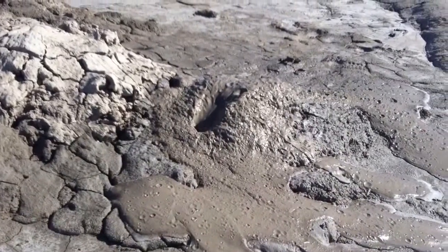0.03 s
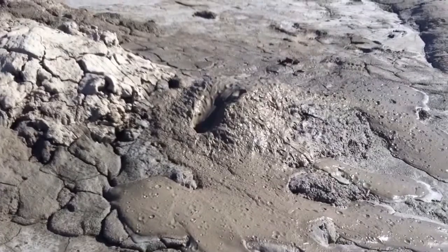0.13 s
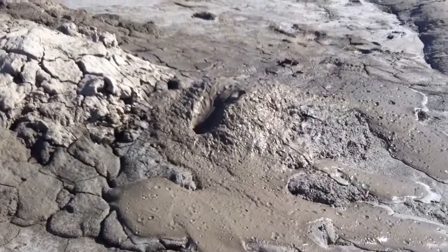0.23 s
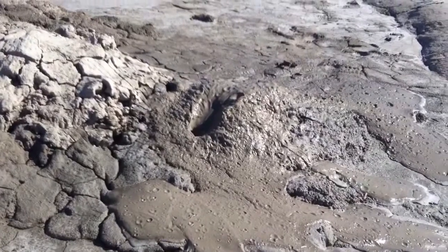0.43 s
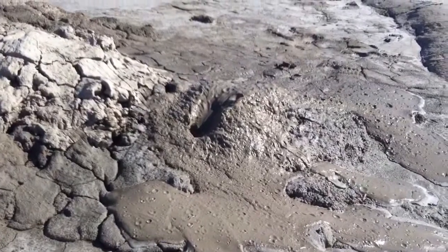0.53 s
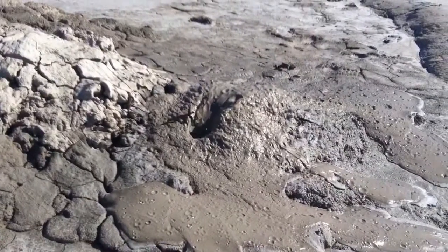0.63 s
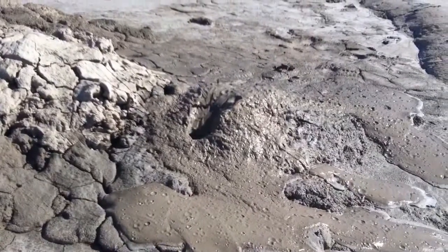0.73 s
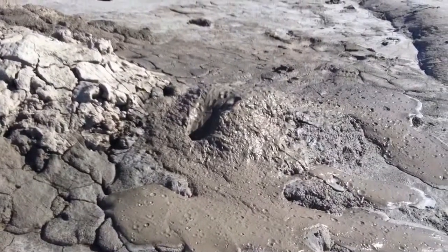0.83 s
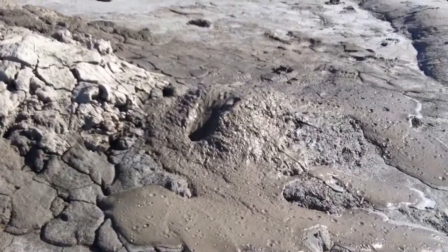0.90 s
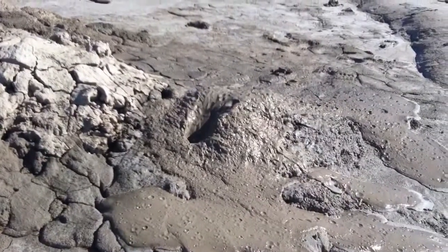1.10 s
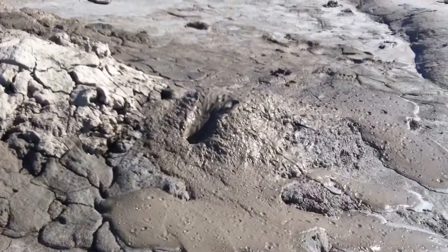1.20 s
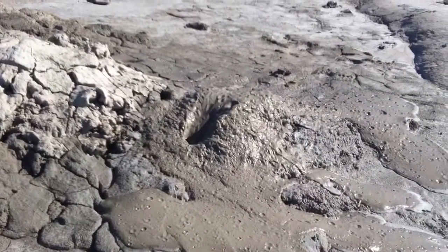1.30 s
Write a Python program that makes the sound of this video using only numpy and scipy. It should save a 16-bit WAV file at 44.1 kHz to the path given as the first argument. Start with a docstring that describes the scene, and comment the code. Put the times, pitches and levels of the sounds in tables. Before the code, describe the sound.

Gas bubbles through thick wet mud close to the microphone, popping and slapping unevenly. The gurgling swells, squelches upward and settles into a few soft, deep gulps, over a faint rush of open-air wind.

```python
"""Bubbles burst with short, mostly rising notes as gas gurgles up through thick mud.
The place is a small vent outdoors, heard close up on one small microphone.
Wet mud slaps and spatters on top, while large pockets gulp down in the throat.
One long gush of tiny bubbles swells in the middle and ends in a rising squelch as gas
squeezes through narrowing cavities. The crusted cone scatters it all; faint wind lies behind."""
import sys
import numpy as np
from scipy import signal
from scipy.fft import rfft, irfft, next_fast_len
from scipy.io import wavfile
from scipy.ndimage import uniform_filter1d

SR = 44100
rng = np.random.default_rng(int(sys.argv[2]) if len(sys.argv) > 2 else 0)


def output_pcm(signal):
    """Save a mono or channel-first signal as 16-bit PCM at the path in sys.argv[1].

    Samples are clipped to [-1, 1] before scaling.
    """
    pcm = np.clip(np.atleast_2d(signal).T, -1, 1) * 32767
    wavfile.write(sys.argv[1], SR, np.round(pcm).astype(np.int16))


N = 59535
T = np.arange(N) / SR


# bubbles bursting at the surface: t/s, f/Hz, level/dB, swell/s, decay/s, glide/(octaves/s)
BUBBLES = [(.048, 1507, -60, 0.0013, 0.0077, 2), (0.053, 3140, -54.5, 0.0012, 0.0012, 19),
           (.106, 1846, -60, 0.0012, 0.019, 13.5), (0.118, 793, -52, 0.0012, 0.0024, 23),
           (.134, 1005, -54.5, 0.0023, 0.0047, 8), (.140, 1758, -47, 0.0053, 0.005, 19),
           (.211, 832, -39.5, 0.013, 0.0015, 7.5), (0.21, 2020, -50.5, 0.0039, 0.011, -6.5),
           (.243, 1227, -42.5, 0.0032, 0.0049, -3.5), (0.243, 2380, -46.5, 0.0013, 0.004, 13),
           (.291, 2355, -41, 0.006, 0.0069, 3), (0.347, 1390, -49.5, 0.0014, 0.0044, -10),
           (.365, 2420, -42.5, 0.0009, 0.0029, 9), (.364, 1860, -40, 0.0033, 0.005, 10),
           (.365, 1393, -52.5, 0.0022, 0.017, 7), (.365, 900, -49, 0.0036, 0.0072, 5),
           (.376, 3900, -43.5, 0.0011, 0.0023, 38), (.400, 4130, -44, 0.003, 0.0031, 2.5),
           (0.424, 1400, -42.5, 0.0012, 0.004, 8.5), (.581, 996, -38, 0.00098, 0.0048, 13),
           (0.633, 1319, -37, 0.0026, 0.017, 8.5), (0.654, 3820, -45, 0.0036, 0.0069, 14.5),
           (.676, 1203, -38, 0.0053, 0.0099, 10.5), (0.679, 2330, -32.5, 0.0037, 0.0031, -2),
           (.771, 944, -30.5, 0.0019, 0.0018, 11), (.7818, 1926, -21.5, 0.00036, 0.0026, 1),
           (.779, 4920, -31, 0.00065, 0.0013, -3), (.843, 223.4, -38, 0.037, 0.013, -1.5),
           (0.882, 1690, -26.5, 0.00081, 0.0016, 10), (.916, 1790, -45, 0.0022, .010, 10.5),
           (.928, 560, -37.5, 0.005, 0.0035, 26), (.967, 1917, -37.5, 0.0021, 0.0051, 13),
           (.981, 2180, -42, 0.0016, 0.0043, 10), (0.983, 1294, -43, 0.003, 0.0065, 11),
           (1.035, 3790, -51, 0.002, 0.0025, 12), (1.036, 7440, -49.5, 0.0028, 0.0028, 8),
           (1.041, 1907, -50.5, 0.0025, 0.0066, 4.5), (1.060, 2210, -43, 0.00088, 0.0025, 15),
           (1.109, 1285, -36, 0.00089, 0.0033, 0)]

def bubbles(roughness=0.35, rough_hz=656):
    """Most bursts ring higher as the hole opens; the tearing film roughens them."""
    out = np.zeros(N)
    for start, hz, db, swell_s, decay_s, glide in BUBBLES:
        add(out, start, from_db(db) * pocket_note(hz, swell_s, decay_s, glide))
    flutter = 1 + roughness * (wobble(rough_hz) + 1j * wobble(rough_hz))  # in level and phase
    return np.real(signal.hilbert(out) * flutter)


# wet slaps of mud at the mouth: t/s, level/dB, cavity f/Hz
SLAPS = [(.173, -49, 3800), (0.219, -40.5, 418), (.243, -34.5, 2020), (.261, -43, 1390), (0.278, -45, 557),
         (0.291, -37.5, 2150), (.300, -41.5, 3000), (.346, -41.5, 1720), (0.376, -42, 3950),
         (.401, -40, 4770), (0.4239, -33, 474), (0.451, -45, 594), (.500, -46, 1360), (.533, -36.5, 462),
         (0.546, -42, 373), (.583, -41, 810), (.602, -36, 730), (.636, -37, 905), (0.645, -32.5, 1560),
         (.667, -33.5, 440), (.683, -43, 1700), (0.725, -35, 1440), (.743, -34, 6500), (.773, -33.5, 1110),
         (0.7856, -30, 2560), (0.7891, -25.5, 4300), (.840, -37, 4600), (.845, -30, 1650),
         (.882, -32.5, 310), (.896, -34, 1510), (.903, -38, 1980), (0.916, -32, 2170), (.931, -33, 990),
         (0.951, -30.5, 2700), (0.967, -38, 5200), (1.012, -42, 448), (1.06, -49.5, 690),
         (1.078, -40.5, 378), (1.109, -36.5, 860)]

def slaps(cavity_q=1.15, spray_db=-11, spray_decay_s=0.0053):
    """Each slap is a soft push and a short spray, heard through a heavily damped cavity."""
    out, t = np.zeros(N), T[:SR // 20]
    for start, db, hz in SLAPS:
        cavity = signal.iirpeak(hz, cavity_q, fs=SR)
        soft_mud = signal.butter(2, min(2.2 * hz, SR / 3), fs=SR)  # rounds off the top
        pulse = np.exp(-2 * np.pi * hz * t)
        push = signal.lfilter(*soft_mud, signal.lfilter(*cavity, pulse))
        hiss = signal.lfilter(*soft_mud, signal.lfilter(*cavity, rng.standard_normal(len(t))))
        spray = rms_one(hiss) * np.exp(-t / spray_decay_s)
        add(out, start, from_db(db) * (push / np.abs(push).max() + from_db(spray_db) * spray))
    return out


# large gas pockets below the surface: t/s, f/Hz, level/dB
GULPS = [(0.028, 163.5, -51.5), (0.191, 248, -47), (.220, 256, -57), (.362, 202, -43), (.513, 214, -38),
         (0.567, 216, -42), (.612, 222, -35.5), (.627, 185, -37.5), (.668, 220, -34.5), (0.693, 241, -44.5),
         (0.894, 168, -39.5), (0.927, 201, -36.5), (0.958, 208, -44), (1.005, 186, -48), (1.028, 166, -42),
         (1.077, 139, -41.5), (1.117, 220, -41.5), (1.134, 130, -43), (1.196, 166, -48),
         (1.231, 228.6, -41), (1.25, 172, -38)]

def gulps():
    """Large pockets thud deep in the throat, sagging slightly in pitch."""
    out = np.zeros(N)
    for start, hz, db in GULPS:
        thud = pocket_note(hz, swell_s=0.0052, decay_s=0.007, octaves_per_s=-1.5)
        add(out, start, from_db(db) * thud)
    return out


# strength of the churning: t/s, level/dB
GUSH_LEVEL = [(0, -79), (.10, -77), (.19, -63.5), (.235, -53), (.27, -58), (.33, -70), (.36, -67),
              (.395, -73), (.44, -60), (.485, -65), (.56, -52), (.66, -47), (.715, -52), (.78, -42),
              (.82, -49.5), (.93, -45), (1.0, -70.5), (1.07, -60), (1.15, -78.5), (1.35, -100)]
# tone of the churning: f/Hz, level/dB
GUSH_COLOUR = [(120, -27), (280, -6.5), (500, 2.5), (760, -7.5), (1000, -3), (1900, -1), (2600, -10.5),
               (3000, -31.5), (6000, -54.5)]
# resonances of the vent: f/Hz, width/Hz, gain/dB
VENT_RESONANCES = [(400, 57, 3), (641, 28, 6), (923, 87, 7.5), (1343, 130, 6), (1550, 60, 5.5),
                   (1833, 38, 10.5), (2278, 98, 10), (2635, 65, 12.5)]

def gush():
    """Countless small bubbles churn and ring inside the vent."""
    churn = bubble_swarm(GUSH_COLOUR, per_s=1700, low_hz=250, high_hz=3023, decay_cycles=1.83)
    return level(GUSH_LEVEL) * rms_one(peaks(churn, VENT_RESONANCES))


# cavities squeezed by the gas: t/s, length/s, first f/Hz, last f/Hz, level/dB, width/Hz
SQUELCHES = [(.84, .13, 1100, 1520, -50.5, 43), (.935, .07, 650, 1600, -55, 50),
             (.89, 0.0903, 1800, 1990, -50, 64), (.86, 0.11, 2050, 2600, -50.5, 28),
             (.688, 0.046, 310, 670, -46.5, 69), (.214, 0.037, 5100, 5400, -59.5, 380),
             (1.295, 0.068, 660, 770, -67, 200)]

def squelches():
    """Escaping gas sounds narrowing cavities, which glide upward; a wide band is a hissing squirt."""
    out = np.zeros(N)
    for start, length_s, first_hz, last_hz, db, width_hz in SQUELCHES:
        progress = np.clip((T - start) / length_s, 0, 1)
        pitch = first_hz * (last_hz / first_hz) ** progress
        phase = 2 * np.pi * np.cumsum(pitch) / SR
        ringing = wobble(width_hz) * np.sin(phase) + wobble(width_hz) * np.cos(phase)
        arch = np.sqrt(np.abs(np.sin(np.pi * progress)))
        out += from_db(db) * arch * ringing
    return out


# strength of the fine wet spatter: t/s, level/dB
SPATTER_LEVEL = [(0, -82), (.19, -72.5), (.25, -64.5), (.33, -72.5), (.355, -65.5), (.425, -67), (.49, -74),
                 (.62, -60.5), (.665, -52), (.72, -55), (.765, -53.5), (.785, -45), (.805, -58.5),
                 (.87, -56.5), (.96, -50.5), (1.015, -74), (1.06, -63.5), (1.15, -80), (1.35, -91)]
# tone of the spatter: f/Hz, level/dB
SPATTER_COLOUR = [(1200, -27), (2900, -5.5), (3900, 5), (5200, -4.5), (6800, -6), (8200, 1.5),
                  (9500, -13.5), (12500, -9.5), (15500, -19.5)]

def spatter(spit_db=2.54, spit_hz=29):
    """The finest bubbles burst on top of the mud in uneven spits."""
    fizz = bubble_swarm(SPATTER_COLOUR, per_s=9500, low_hz=2452, high_hz=15500, decay_cycles=6.9)
    spits = from_db(spit_db * wobble(spit_hz))
    return level(SPATTER_LEVEL) * fizz * spits


# strength of the rumble: t/s, level/dB
RUMBLE_LEVEL = [(0, -64.5), (.09, -70), (.24, -57.5), (.32, -64), (.405, -65.5), (.48, -55.5), (.66, -51),
                (.74, -54), (.88, -50), (1.0, -53.5), (1.13, -57.5), (1.19, -64.5), (1.35, -68)]
# tone of the rumble: f/Hz, level/dB
RUMBLE_COLOUR = [(50, -23.5), (100, -2.5), (160, -1.5), (240, 1.5), (330, -9), (600, -14.5), (2000, -53.5)]

def rumble():
    """Low, quickly damped bubbles blur together down in the throat."""
    swarm = bubble_swarm(RUMBLE_COLOUR, per_s=350, low_hz=124, high_hz=424, decay_cycles=0.87)
    return level(RUMBLE_LEVEL) * swarm


def cone(x, scatter_db=-9.5, decay_s=0.0095):
    """The crusted cone adds a very short scatter of reflections."""
    t = T[:SR // 10]
    tail = rng.standard_normal(len(t)) * np.exp(-t / decay_s) * (t > .002)
    reflections = signal.fftconvolve(x, tail / np.linalg.norm(tail))[:N]
    return x + from_db(scatter_db) * reflections


# dips in the treble: f/Hz, width/Hz, gain/dB
RECORDING_NOTCHES = [(2984, 320, -7), (4445, 106, -9), (6080, 340, -13), (9950, 1900, -31)]

def notched(x):
    """A few steady, narrow bands are missing from the recorded treble."""
    return peaks(x, RECORDING_NOTCHES)


# tone of the open air: f/Hz, level/dB
WIND_COLOUR = [(20, -1), (110, 3), (400, -0.5), (1000, -12), (2500, -19.5), (8000, -22.5), (15000, -25)]

def wind(db=-65):
    """Faint wind behind the vent, a steady low rush."""
    return from_db(db) * rms_one(coloured(rng.standard_normal(N), WIND_COLOUR))


def pocket_note(hz, swell_s, decay_s, octaves_per_s):
    """A gas pocket swells into ringing and dies away; its pitch glides for the first 50 ms."""
    t = T[:SR // 10]
    pitch = hz * 2 ** (octaves_per_s * np.minimum(t, 0.05))
    envelope = np.minimum(t / swell_s, 1) * np.exp(-np.maximum(t - swell_s, 0) / decay_s)
    return envelope * np.sin(2 * np.pi * np.cumsum(pitch) / SR)


def bubble_swarm(colour, per_s, low_hz, high_hz, decay_cycles, spread_db=4.5, rise=0.056):
    """Tiny bubbles of uneven size and pitch burst at random moments, evened out to a steady level."""
    out = np.zeros(N)
    for when, place, size, sign in rng.random((int(per_s * N / SR), 4)):
        hz = low_hz * (high_hz / low_hz) ** place
        age = T[:int(6 * decay_cycles / hz * SR) + 2] * hz / decay_cycles  # in decay times
        ring = np.exp(-age) * np.sin(2 * np.pi * decay_cycles * age * (1 + rise * age / 2))
        strength = from_db(spread_db * min(-np.log(1 - size), 4)) * np.sign(sign - .5)
        add(out, when * N / SR, strength * rms_one(ring) * hz / high_hz)
    out = coloured(out, colour)
    power = uniform_filter1d(out ** 2, size=1100)  # over 25 ms
    return rms_one(out / np.sqrt(np.abs(power) + power.mean() / 20))


def coloured(x, colour):
    """Causal (minimum-phase) filter through points of f/Hz, level/dB."""
    size = next_fast_len(2 * N) // 2 * 2
    hz, db = np.transpose(colour)
    bin_hz = np.arange(size // 2 + 1) * SR / size
    gain = from_db(np.interp(np.log(bin_hz + 1), np.log(hz), db))
    cepstrum = irfft(np.log(gain))
    cepstrum[1:size // 2] *= 2
    cepstrum[size // 2 + 1:] = 0
    return irfft(rfft(x, size) * np.exp(rfft(cepstrum)))[:N]


def peaks(x, bands):
    """Chain of resonant boosts or cuts."""
    for hz, width_hz, db in bands:
        band = signal.lfilter(*signal.iirpeak(hz, hz / width_hz, fs=SR), x)
        x = x + (from_db(db) - 1) * band
    return x


def wobble(hz):
    """Random motion up to a rate, at unit rms."""
    lowpass = signal.butter(2, hz, fs=SR, output="sos")
    return rms_one(signal.sosfilt(lowpass, rng.standard_normal(2 * N))[N:])


def from_db(db):
    """Decibels to gain."""
    return 10 ** (np.asarray(db) / 20)


def rms_one(x):
    """Scale to unit rms."""
    return x / np.sqrt(np.mean(x ** 2) + 1e-20)


def level(curve):
    """Gain over time from points of t/s, level/dB."""
    return from_db(np.interp(T, *np.transpose(curve)))


def add(out, start_s, sound):
    """Mix a sound in at a time."""
    i = int(np.clip(start_s * SR, 0, N - 1))
    out[i:i + len(sound)] += sound[:N - i]


def scene():
    """The vent close in front, the wind behind, in mono."""
    air = wind()
    mud = bubbles() + slaps() + gulps() + squelches() + gush() + spatter() + rumble()
    return (notched(cone(mud)) + air)[None]


def record(dry, low_cut_hz=82, high_cut_hz=15700):
    """The small microphone loses the deep bass; the top is cut steeply."""
    low_cut = signal.butter(2, low_cut_hz, "high", fs=SR, output="sos")
    high_cut = signal.ellip(12, .1, 80, high_cut_hz, fs=SR, output="sos")
    return signal.sosfilt(high_cut, signal.sosfilt(low_cut, dry))


dry = scene()
out = record(dry)
output_pcm(out)
```